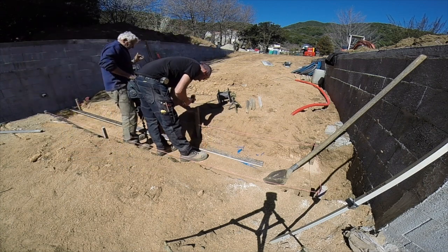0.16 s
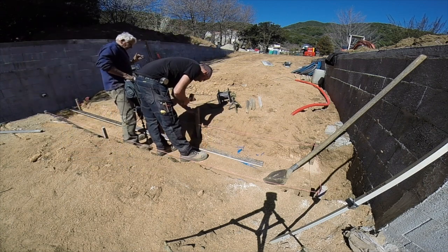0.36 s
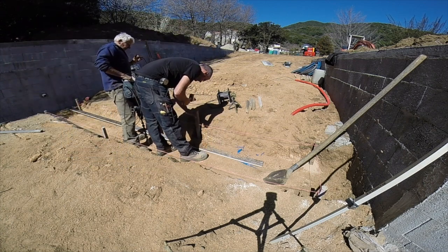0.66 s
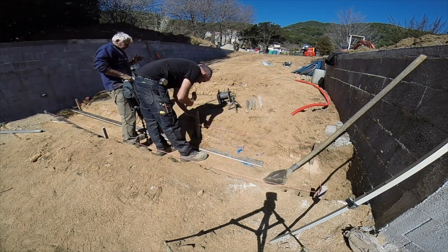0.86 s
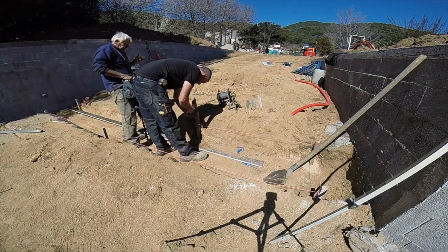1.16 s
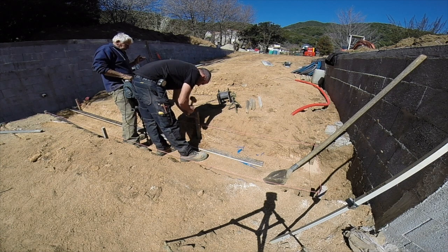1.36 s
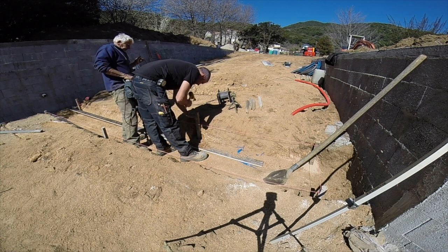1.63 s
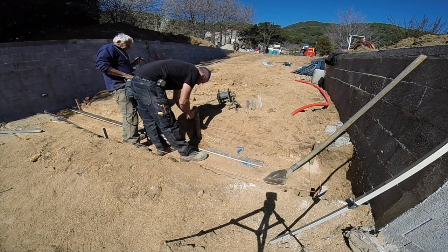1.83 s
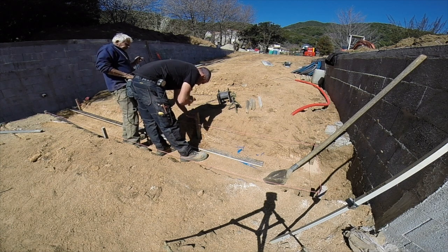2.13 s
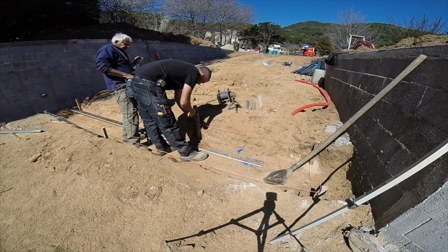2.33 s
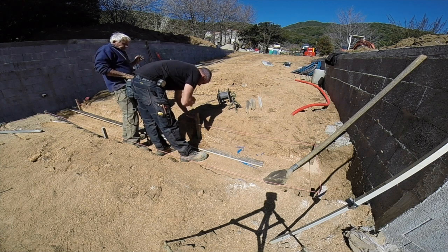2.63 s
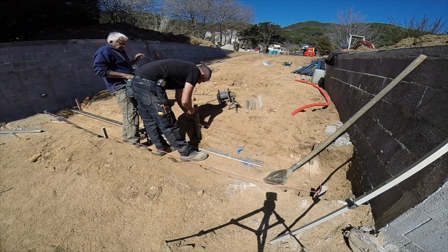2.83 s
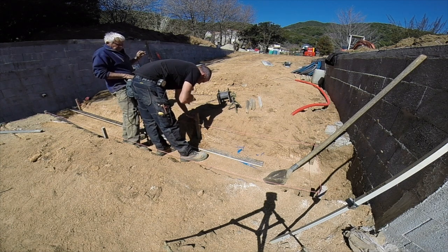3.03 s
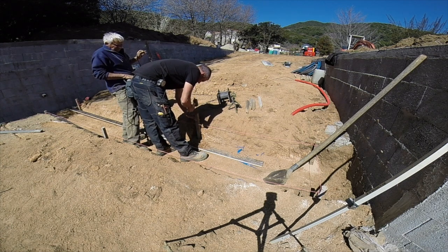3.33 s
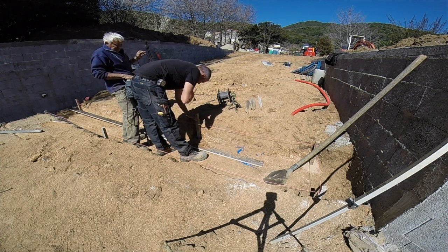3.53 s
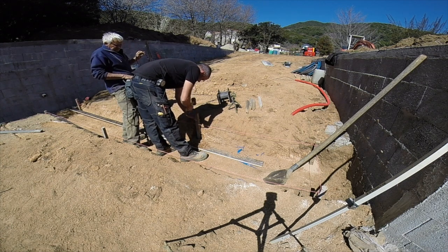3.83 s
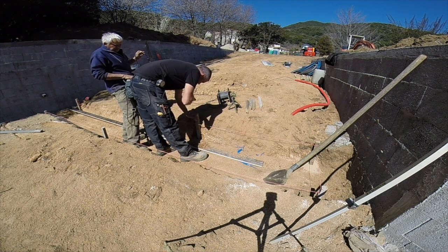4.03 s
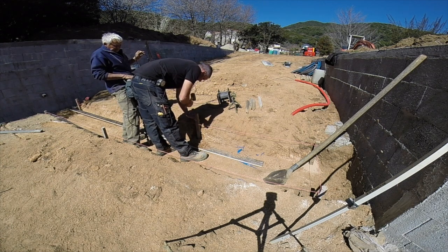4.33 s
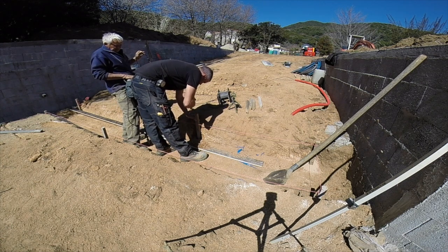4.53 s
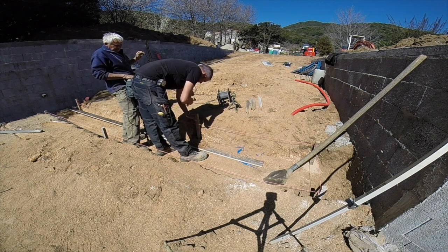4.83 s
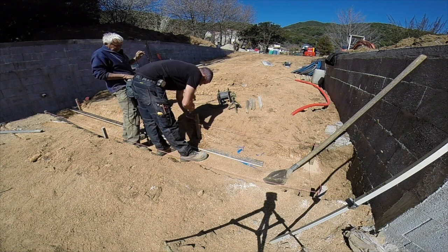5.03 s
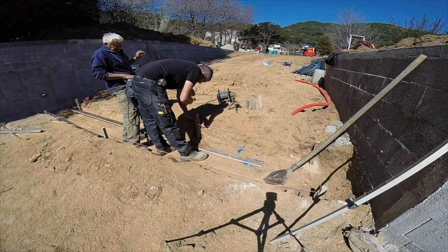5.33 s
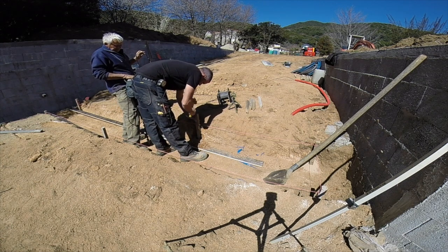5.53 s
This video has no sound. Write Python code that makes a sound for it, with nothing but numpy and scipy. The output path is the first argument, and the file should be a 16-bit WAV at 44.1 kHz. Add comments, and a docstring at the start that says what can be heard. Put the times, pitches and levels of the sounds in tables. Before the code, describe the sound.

Outdoors in a sandy building pit, about a second of light wind and far bird whistles comes before a hammer starts on a wooden stake. Eleven steady blows follow, roughly two a second, growing from light to hard. Each is a short, dry knock over a ground thud, with quick wall echoes. The camera microphone is close, and its limiter dips the background after hard hits.

```python
"""In a pit in packed sandy soil, close to the camera's microphone, a man drives a wooden stake with eleven
evenly paced hammer blows, light at first, then hard. Each is a dry knock of damped modes and contact noise
over a thud of the ground; as the soil grips the stake its low ring fades, and the pit walls answer in echoes.
Light wind, a distant valley hum and foliage are shaped noise, with far birds as gliding whistles and a faint
camera whine; the camera's limiter ducks everything when a blow passes its ceiling."""
import sys
import numpy as np
from scipy import signal
from scipy.fft import rfft, irfft, next_fast_len
from scipy.io import wavfile
from scipy.ndimage import uniform_filter1d, minimum_filter1d, map_coordinates

SR = 44100
rng = np.random.default_rng(int(sys.argv[2]) if len(sys.argv) > 2 else 0)


def unload_audio(sound):
    """Save the sound as a 16-bit wav file, at the path given as the first command line argument."""
    columns = np.transpose(np.atleast_2d(sound))
    # keep every value between -1 and 1, then stretch to whole-number steps
    steps = np.round(np.clip(columns, -1, 1) * 32767)
    wavfile.write(sys.argv[1], SR, steps.astype(np.int16))


N = 250929  # length in samples


def hammering():
    """Every blow, with the soil's shudder, the pit's echoes and boom, near scatter and the far slope."""
    # The hammer blows. Each row: start in seconds, force in dB, share into the ground in dB, off-centre ring
    # in dB, top mode in dB, pitch factor of the stake, relative level of the crack in dB.
    blows = [(1.0627, 2.5, 5, 0, 2, .98, -30), (1.4633, 5.5, 3, 0, 2, .98, -26.5),
             (1.8737, 7, -2.5, 8.5, 2, 1, -26.5), (2.3086, 12, -4.5, 2, 0, 1, -33),
             (2.7805, 13, -1.5, -6.5, -1.5, .97, -36.5), (3.2447, 7.5, 1, 3.5, -10, .97, -32.5),
             (3.7214, 17, -6.5, -4.5, 3.5, 0.97, -35), (4.1829, 10.5, 1, 4, 5, .96, -31.5),
             (4.6484, 15, -0.5, -0.5, 4, 1.06, -32), (5.1313, 15, -0.5, -5, -5, 1.06, -30.5),
             (5.6153, 20, 0.5, 4, 7.5, 0.98, -28)]
    # First echoes from the pit walls. Each row: delay in seconds, level in dB.
    walls = [(0.0184, -26), (0.0293, -34), (.04, -34.5)]
    # Loose soil shuddering round the stake. Each row: frequency in Hz, level in dB.
    soil_colour = [(300, -13), (900, -11.5), (1800, -23.5), (8000, -15.5)]
    # How long the soil shudders. Each row: frequency in Hz, t60 in seconds.
    soil_lasts = [(300, 0.16), (3000, 0.048)]
    # Scatter from soil, the man and walls. Each row: frequency in Hz, level in dB.
    scatter_colour = [(60, -6), (170, -4.5), (260, -19), (350, -21), (500, -14), (900, -20.5),
                      (1700, -35.5), (3000, -20.5), (5000, -17.5), (7000, -6.5), (12000, -11.5),
                      (15000, -23)]
    # How long the scatter lasts. Each row: frequency in Hz, t60 in seconds.
    scatter_lasts = [(150, 0.15), (300, 0.089), (600, 0.025), (1500, 0.28), (4000, .18), (12000, 0.049)]
    # The far slope's faint answer. Each row: frequency in Hz, level in dB.
    slope_colour = [(150, -26), (300, -38), (500, -40.5), (1200, -41), (3000, -40), (10000, -35.5)]
    slope_lasts = [(300, .5), (3000, .45), (10000, .25)]  # each row: frequency in Hz, t60 in seconds
    first_echo_s = walls[0][0]
    track = np.zeros(N)
    for count, (s, force_db, *stroke) in enumerate(blows):
        knock = amp(force_db) * blow(count, *stroke)
        add(track, s, knock)
        add(track, s + first_echo_s, boom(knock))
        for delay, db in walls:
            add(track, s + delay, amp(db) * knock)
        soil = tail(soil_colour, soil_lasts, delay=0.0045, attack=0.00033)
        near = tail(scatter_colour, scatter_lasts, delay=0.025, attack=0.00061)
        far = tail(slope_colour, slope_lasts, delay=.07, attack=.015)
        # diffuse sound gathers what the stake sends out to every side
        knock_colour = all_round(knock)
        for echo in (soil, near, far):
            add(track, s, filtered(echo, lambda hz: amp(along(knock_colour, hz))))
    return track


def blow(count, ground_db, off_centre_db, top_db, pitch, crack_db):
    """One stroke: the soil damps the stake's modes within a few cycles and takes up the push as a thud."""
    t = np.arange(SR // 10) / SR
    thud = amp(ground_db - 19.5) * ground_thud(t, count)
    # the hammer's weight gives every stroke a deep push in the same proportion
    push = amp(-33.0) * mode(t, hz=109, t60=0.038, attack=.001)
    wood = stake_ring(t, count, ground_db, off_centre_db, top_db, pitch)
    return thud + push + wood + amp(crack_db + 5.0) * crack(t)


def ground_thud(t, count):
    """Two damped resonances of the ground, which fall in pitch as the soil packs."""
    loose_hz, packed_hz, half_packed_blow = 449, 323, 2.0
    hz = loose_hz + (packed_hz - loose_hz) * settled(count, half_packed_blow)
    low = mode(t, hz, t60=0.014, attack=0.0035)
    high = mode(t, hz * 1.6, t60=0.024, attack=0.0081)
    return low - amp(-12.5) * high


def stake_ring(t, count, ground_db, off_centre_db, top_db, pitch):
    """Four bending modes: the grip fades the first and lifts the third; an off-centre blow drives the second."""
    # The bending modes. Each row: frequency in Hz while loose, frequency in Hz once gripped,
    # level in dB while loose, level in dB once gripped; each blow's pitch factor and shares are applied on top.
    bending = [(737, 740, -16, -23.5), (1090, 1206, -23.5, -21.5), (1681, 1805, -18.5, -16.5),
               (3010, 2520, -22.5, -28.5)]
    half_gripped_blow = 3.6
    grip = settled(count, half_gripped_blow)
    loose_hz, gripped_hz, loose_db, gripped_db = np.transpose(bending)
    first_hz, second_hz, third_hz, fourth_hz = pitch * (loose_hz + grip * (gripped_hz - loose_hz))
    first_db, second_db, third_db, fourth_db = loose_db + grip * (gripped_db - loose_db)
    wood = amp(first_db + ground_db) * mode(t, first_hz, t60=0.015, attack=0.0011)
    wood -= amp(second_db + off_centre_db) * mode(t, second_hz, t60=.008, attack=.001)
    wood += amp(third_db) * mode(t, third_hz, t60=.007, attack=.0015)
    wood -= amp(fourth_db + top_db) * mode(t, fourth_hz, t60=0.0058, attack=0.0004)
    return wood


def crack(t):
    """Stiff high modes of stake and hammer head, under the splintery noise of the contact."""
    # The high modes. Each row: central frequency in Hz, central level in dB, t60 in seconds.
    high_modes = [(3800, -3, 0.0028), (4580, 5.5, 0.0057), (5520, -6, 0.025), (7870, -6, 0.004),
                  (11330, -10, 0.011)]
    # The contact noise. Each row: frequency in Hz, density in dB per Hz.
    contact_spectrum = [(1500, -3), (2500, 8), (4500, 1), (6500, -18.5), (9000, -9), (10200, -18.5),
                        (11800, -15), (15500, -33.5)]
    ring = np.zeros(len(t))
    # no two blows land on the same spot, so the modes change their shares and pitches
    for hz, db, t60 in high_modes:
        share = amp(db + 2 * rng.normal())
        ring += share * mode(t, hz * (1 + 0.028 * rng.normal()), t60, attack=0.00039)
    contact = noise(contact_spectrum, len(t)) * fade(t, t60=0.014, attack=0.001)
    return burst(burst(ring) + amp(11) * burst(contact))


def settled(count, half_blow):
    """How far the soil has closed round the stake after count blows, 0-1, half done at half_blow."""
    settle_blows = 0.7
    return .5 + .5 * np.tanh((count - half_blow) / settle_blows)


def boom(knock):
    """The standing waves of the air between the pit walls, driven by the knock."""
    # The standing waves. Each row: frequency in Hz, gain in dB, t60 in seconds.
    pit = [(173, 0, 0.18), (304.7, -12, .3)]
    t = np.arange(SR // 2) / SR
    waves = np.zeros(len(t))
    for hz, db, t60 in pit:
        gain = 2 * np.log(1000) / (t60 * SR)  # unity at resonance before the row's gain
        waves += gain * amp(db - 60 * t / t60) * np.sin(2 * np.pi * hz * t)
    return signal.fftconvolve(knock, waves)


def tail(colour, lasts, delay, attack):
    """A diffuse echo of noise whose frequencies die each at their own speed."""
    hz, t, z = signal.stft(rng.standard_normal(SR * 3 // 4), SR, nperseg=512)
    t60 = along(lasts, hz)[:, None]
    gain = amp(along(colour, hz))[:, None] * np.sqrt(2 * np.log(1000) / (t60 * SR))
    echo = signal.istft(z * gain * amp(-60 * t / t60), SR, nperseg=512)[1]
    onset = 1 - np.exp(-np.arange(len(echo)) / SR / attack)
    return np.pad(echo * onset, (round(delay * SR), 0))


def all_round(sound):
    """The broad colour that a sound sends out over all directions, as rows of Hz and dB."""
    centres = np.geomspace(60, 16000, 48)
    hz = np.fft.rfftfreq(len(sound), 1 / SR) + 1
    weights = np.exp(-(np.log2(hz / centres[:, None]) / .22) ** 2)  # width in octaves
    power = weights @ np.abs(rfft(sound)) ** 2 / weights.sum(axis=1)
    return np.column_stack([centres, 10 * np.log10(power + 1e-20)])


def grit():
    """Small grains drop on the soil, each a dry tick of quickly fading noise."""
    # The ticks. Each row: start in seconds, level in dB.
    grains = [(4.818, -56), (4.932, -55)]
    spectrum = [(2500, -11.5), (4000, 2.5), (7000, -12.0), (13000, -19.0)]  # Hz, dB per Hz
    track, t = np.zeros(N), np.arange(SR // 20) / SR
    for s, db in grains:
        tick = noise(spectrum, len(t)) * fade(t, t60=0.02, attack=0.00025)
        add(track, s, amp(db) * burst(tick))
    return track


def birds():
    """Far, gliding whistles, flickering in level and smeared by the trees."""
    # The clearer whistles. Each row: start in seconds, length in seconds, start frequency in Hz,
    # middle frequency in Hz, end frequency in Hz, level in dB before flicker and smear.
    whistles = [(.32, .22, 2700, 2450, 1950, -60), (.49, .11, 2400, 2760, 2880, -64),
                (1.17, .25, 2900, 2700, 2560, -59), (2.01, .1, 1690, 1750, 2050, -62),
                (2.07, .15, 1980, 2320, 2370, -62), (2.51, .06, 3600, 3100, 2800, -64),
                (2.68, .06, 3500, 3100, 2800, -66), (3.08, .13, 2250, 2230, 2200, -69),
                (3.47, .23, 1910, 1880, 1890, -66), (3.47, .16, 3050, 3330, 3100, -70),
                (4.78, .22, 2850, 2750, 2500, -66)]
    track = np.zeros(N)
    for s, length, start_hz, middle_hz, end_hz, db in whistles + chorus(count=10):
        u = np.linspace(0, 1, int(length * SR))
        hz = np.polyval(np.polyfit([0, .5, 1], [start_hz, middle_hz, end_hz], 2), u)
        tone = np.sin(2 * np.pi * np.cumsum(hz) / SR)
        add(track, s, amp(db) * unit(tone * signal.windows.tukey(len(u), .5)))
    track = track * amp(1.8 * wobble(35) - 1.5)
    trees = tail([(2500, -3.0)], [(2500, 0.44)], delay=0.0099, attack=0.0042)
    return track + signal.fftconvolve(track, trees)[:N]


def chorus(count):
    """Fainter birds at random times and pitches, as rows like those of the clearer whistles."""
    pitch_hz, spread, length_s, level_db = 2850, 0.13, 0.066, -71.5  # spread as a share of the pitch
    calls = []
    for when in rng.random(count):
        glide_hz = pitch_hz * (1 + spread * rng.standard_normal(3))
        calls.append((when * N / SR, length_s, *glide_hz, level_db))
    return calls


def air():
    """Wind buffets the microphone over the valley's hum, the hiss of foliage and the camera's faint whine."""
    # The breeze swells and slackens. Each row: centre in seconds, half width in seconds, change in dB.
    gusts = [(0.349, .6, 4.5), (3.65, .22, -5.5)]
    # Wind on the microphone. Each row: frequency in Hz, density in dB per Hz.
    wind_spectrum = [(12, -39.5), (20, -9), (38, 5), (59, 6.5), (86, -10), (111, -6), (135, -23),
                     (200, -19), (260, -57), (440, -120)]
    # The distant valley. Each row: frequency in Hz, density in dB per Hz.
    valley_spectrum = [(65, -20.5), (110, 1.5), (167, -7), (316, -8), (393, -10), (823, -6.5), (1250, -15),
                       (1350, -15.5), (3500, -34), (4550, -55), (7700, -120)]
    # Leaves. Each row: frequency in Hz, density in dB per Hz.
    foliage_spectrum = [(1000, -16.5), (1800, -2.5), (3000, -1.5), (4200, -6.5), (6000, -12), (9500, -16),
                        (12000, -17.5), (13200, -19), (16000, -31)]
    t = np.arange(N) / SR
    gust_db = sum(db * np.exp(-((t - s) / width) ** 2) for s, width, db in gusts)
    wind = amp(-50 + gust_db + 1.7 * wobble(2.4)) * noise(wind_spectrum, N)
    valley = amp(-55.5 + 2.1 * wobble(2.3)) * noise(valley_spectrum, N)
    hiss = noise(foliage_spectrum, N) + amp(-15.5) * whine(hz=8350, pulse_hz=46.7)
    return wind + valley + amp(-63.5) * hiss


def whine(hz, pulse_hz):
    """A thin, high electrical tone of unsteady phase that comes in regular pulses, rms 1."""
    t = np.arange(N) / SR
    gate = np.exp(6 * np.cos(2 * np.pi * pulse_hz * t))
    return unit(gate * np.sin(2 * np.pi * hz * t + 1.8 * wobble(320)))


def limiter(x):
    """The gain drops just ahead of anything over the ceiling and creeps back at a steady rate."""
    ceiling_db, sense_s, look_ahead_s, recover_db_per_s = -6, .0012, 0.0095, 14
    level_db = 10 * np.log10(np.abs(uniform_filter1d(x ** 2, int(sense_s * SR))) + 1e-12)
    needed_db = minimum_filter1d(np.minimum(ceiling_db - level_db, 0), 2 * int(look_ahead_s * SR))
    climb_db = recover_db_per_s * np.arange(N) / SR
    return x * amp(np.minimum.accumulate(needed_db - climb_db) + climb_db)


def mode(t, hz, t60, attack):
    """One damped resonance, scaled as a burst."""
    return burst(np.sin(2 * np.pi * hz * t) * fade(t, t60, attack))


def fade(t, t60, attack):
    """A quick rise and an exponential decay."""
    return (1 - np.exp(-(t / attack) ** 2)) * amp(-60 * t / t60)


def burst(x):
    """Scale a short sound to the energy of 10 ms at rms 1."""
    return x * np.sqrt(SR / 100 / (np.sum(x ** 2) + 1e-20))


def noise(spectrum, size):
    """Coloured noise of rms 1."""
    return unit(filtered(rng.standard_normal(size), lambda hz: amp(along(spectrum, hz))))


def filtered(x, response):
    """Weight the spectrum of x by a response of frequency."""
    m = next_fast_len(len(x) + 8192)
    return irfft(rfft(x, m) * response(np.fft.rfftfreq(m, 1 / SR)), m)[:len(x)]


def along(points, hz):
    """Interpolate rows of Hz and value on a log frequency axis."""
    f, v = np.transpose(points)
    return np.interp(np.log(hz + 1), np.log(f + 1), v)


def wobble(rate):
    """A smooth random curve, rate knots a second."""
    knots = rng.standard_normal(int(N * rate / SR) + 4)
    return map_coordinates(knots, [np.arange(N) * rate / SR])


def add(track, s, sound):
    """Mix a sound into the track at s seconds."""
    part = track[max(round(s * SR), 0):][:len(sound)]
    part += sound[:len(part)]


def amp(db):
    """Turn dB into an amplitude factor."""
    return 10 ** (np.asarray(db) / 20)


def unit(x):
    """Scale to rms 1."""
    return x / np.sqrt(np.mean(x ** 2) + 1e-20)


def scene():
    """The blows and falling grit in front, the birds and the air behind, in one channel."""
    return (hammering() + grit() + birds() + air())[None]


def record(dry):
    """The camera limits the blows, rounds off the highest peaks and cuts steeply above its band limit."""
    top_hz = 15400
    held = limiter(dry[0])
    rounded = held / (1 + np.abs(held) ** 8) ** (1 / 8)
    return filtered(rounded, lambda hz: 1 / (1 + (hz / top_hz) ** 80))[None]


dry = scene()
out = record(dry)
unload_audio(out)
```